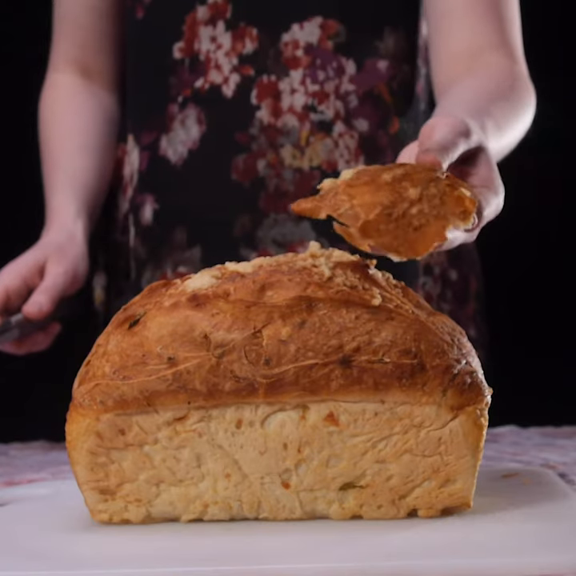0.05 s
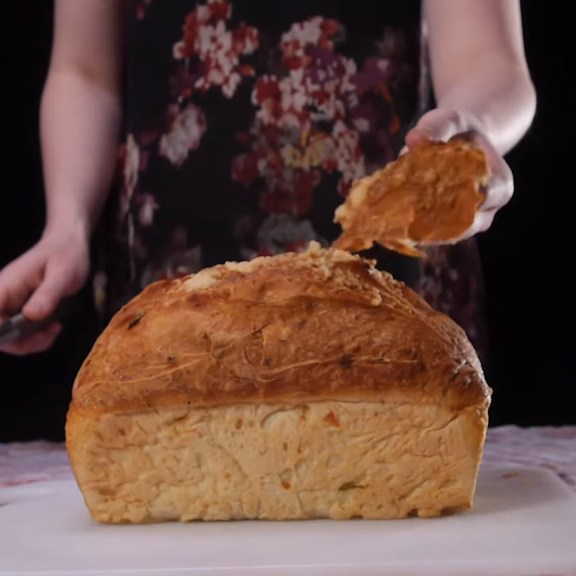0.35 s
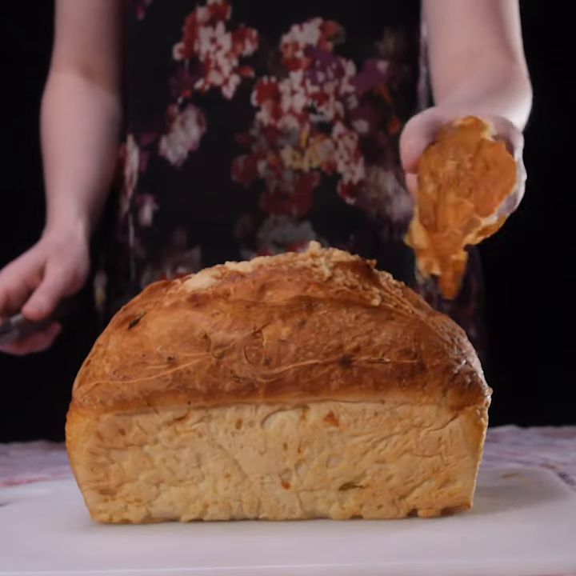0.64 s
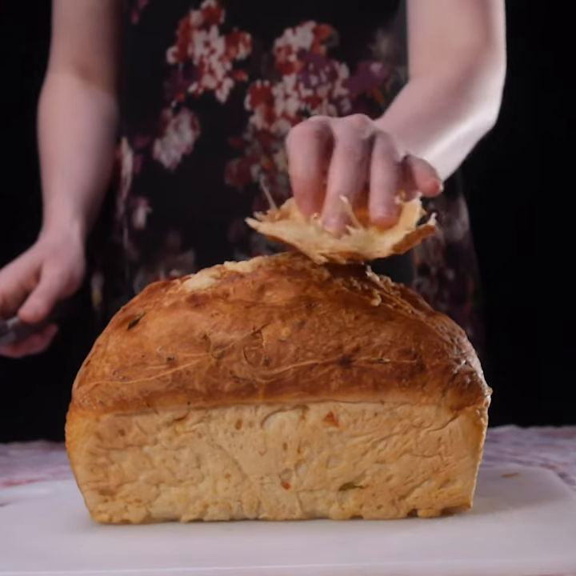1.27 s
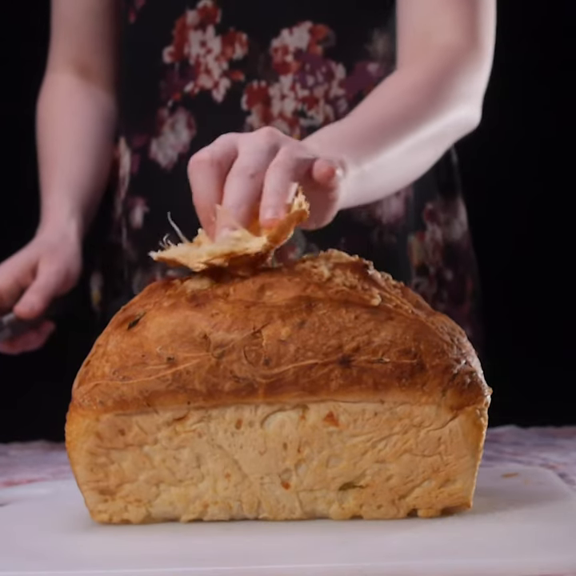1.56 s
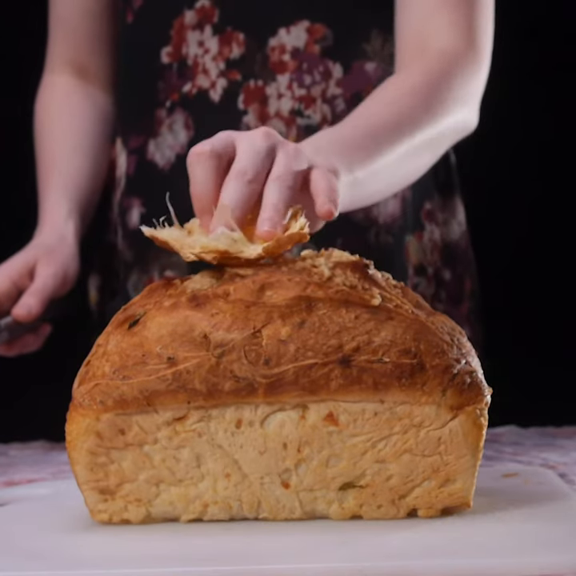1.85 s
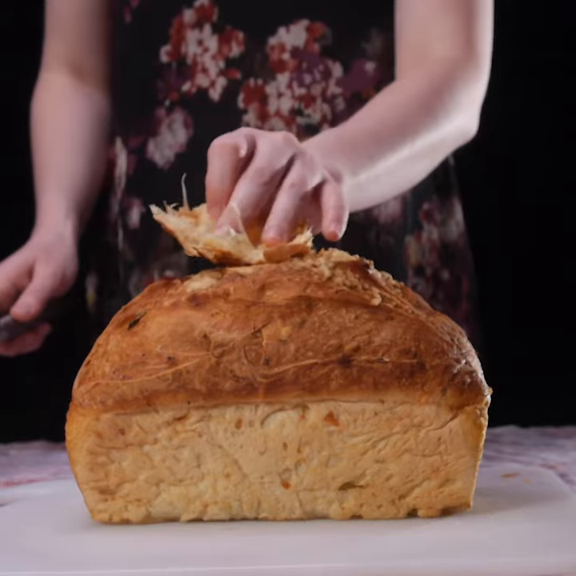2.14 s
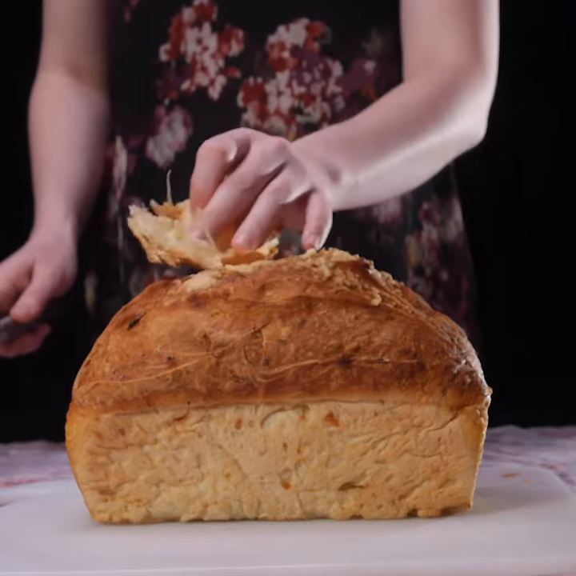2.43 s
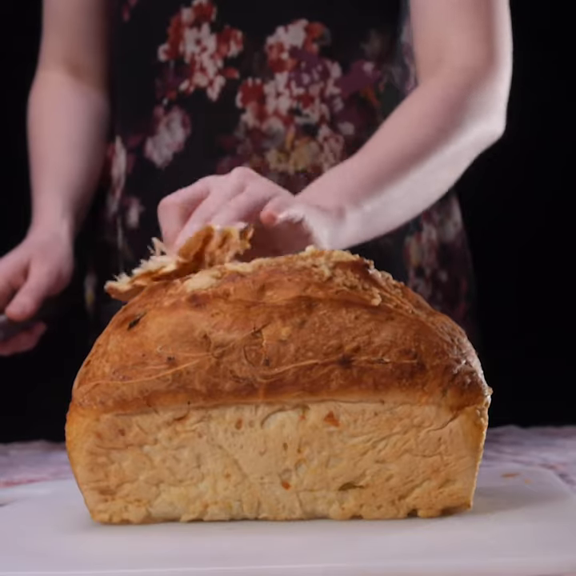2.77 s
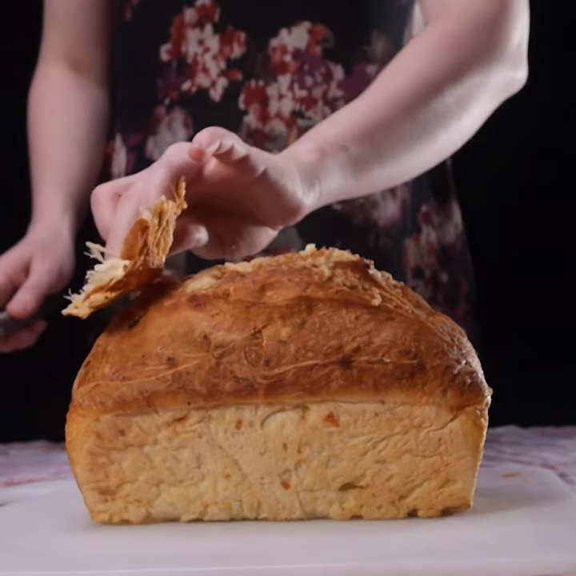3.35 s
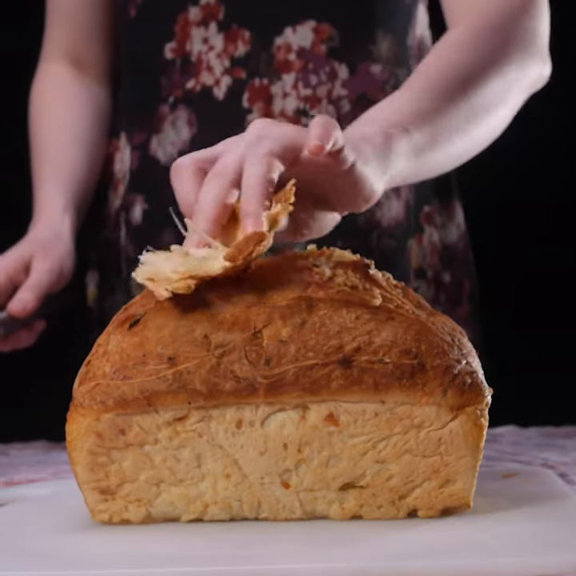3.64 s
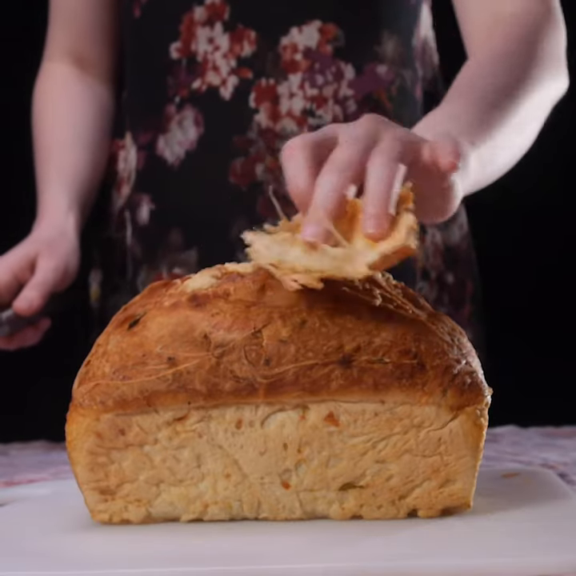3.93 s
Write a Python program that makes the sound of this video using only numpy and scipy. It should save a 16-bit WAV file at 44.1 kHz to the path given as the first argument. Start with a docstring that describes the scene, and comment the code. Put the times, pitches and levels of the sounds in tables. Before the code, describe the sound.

Crisp scraping and ticking of a crust piece dragged across a loaf of bread.

```python
"""Crust scraping a loaf

A torn piece of crust is dragged over the dry top of a loaf, close by in a quiet room.
Its edge catches on countless tiny ridges: each slip knocks the hollow loaf and snaps in the brittle
crust. Between the long drags come brief scratches, single ticks and soft bumps, over a low room rumble."""
import sys
import numpy as np
from scipy import signal
from scipy.fft import rfft, irfft
from scipy.io import wavfile
from scipy.ndimage import uniform_filter1d

SR = 44100
rng = np.random.default_rng(int(sys.argv[2]) if len(sys.argv) > 2 else 0)


def store_pcm(level_fs):
    """Save levels as 16-bit WAV."""
    pcm = np.round(np.clip(level_fs, -1, 1) * 32767).astype(np.int16)
    wavfile.write(sys.argv[1], SR, np.atleast_2d(pcm).T)


N = 176400
T = np.arange(N) / SR
LOAF, CRUST, FLAKES = range(3)   # the three voices of a scrape: hollow body, crunch, fine treble

# Tone of the finest flakes, with the piece lying flat and up on its tip.
# Each row: frequency in Hz, relative level in dB.
FLAKES_FLAT = [(4000, -46.5), (6200, -4), (7900, 5), (8700, 2.5), (9600, -14.5), (11000, -11), (12700, -3),
               (14000, -13), (15500, -20)]
FLAKES_TIP = [(4000, -26.5), (6300, 3), (8300, -0.5), (10000, -4.5), (11500, -10), (13600, -8),
              (15500, -13)]


def from_db(db):
    """Decibels to gain."""
    return 10 ** (np.asarray(db) / 20)


def rms_one(x):
    """Scale to rms 1."""
    return x / np.sqrt(np.mean(x ** 2) + 1e-20)


def unit_energy(x):
    """Scale a response so that it keeps the power of white noise."""
    return x / np.sqrt(np.sum(x ** 2))


def levelled(x, samples, floor=0):
    """Ride the gain so that the running rms stays near 1."""
    return x / np.sqrt(uniform_filter1d(x ** 2, size=samples) + floor)


def through(x, response):
    """Pass a sound through an impulse response."""
    return signal.fftconvolve(x, response)[:len(x)]


def butter(x, hz, kind):
    """Second-order low-pass or high-pass."""
    return signal.sosfilt(signal.butter(2, hz, kind, fs=SR, output="sos"), x)


def resonance(x, hz, t60):
    """One ringing mode, with gain 1 at its peak."""
    r = from_db(-60 / (t60 * SR))
    feedback = [1, -2 * r * np.cos(2 * np.pi * hz / SR), r * r]
    return signal.lfilter(np.array([1, 0, -1]) * (1 - r * r) / 2, feedback, x)


def response_of(spectrum, size=16384):
    """Minimum-phase impulse response for a tone curve of (Hz, relative dB) points."""
    hz, db = np.transpose(spectrum)
    grid_hz = np.maximum(np.arange(size // 2 + 1) * SR / size, 1)
    gain = from_db(np.interp(np.log(grid_hz), np.log(hz), db))
    cepstrum = irfft(np.log(gain))
    cepstrum[1:size // 2] *= 2
    cepstrum[size // 2 + 1:] = 0
    return unit_energy(irfft(np.exp(rfft(cepstrum))))


def noise(spectrum):
    """Steady noise of one colour, rms 1."""
    return rms_one(through(rng.standard_normal(N + SR), response_of(spectrum))[SR:])


def drift(hz):
    """Smooth random wobble, rolling off above hz; rms 1."""
    r = np.exp(-2 * np.pi * hz / SR)
    return rms_one(signal.lfilter([1], [1, -2 * r, r * r], rng.standard_normal(N + SR))[SR:])


def gate(start, end, attack_s=0.0068, release_s=0.005):
    """Quick attack, hold, exponential release."""
    attack = np.clip((T - start) / attack_s + .5, 0, 1)
    return attack * np.exp(-np.clip((T - end) / release_s, 0, 20))


def room_tone(rumble_db=-30, hiss_db=-55.5):
    """The still air of the room: a deep rumble and a faint hiss."""
    # Tone curves of the two beds. Each row: frequency in Hz, relative level in dB.
    rumble = [(12, -1.5), (22, 0.5), (30, -10), (38, -29), (49, -24.5), (59, -34), (200, -66.5)]
    hiss = [(40, -20), (100, 2), (160, -7.5), (500, -15), (2000, -24.5), (8500, -33), (15500, -48)]
    return from_db(rumble_db) * noise(rumble) + from_db(hiss_db) * noise(hiss)


def reflections(t60):
    """Dense echoes that start after a millisecond and die away."""
    t = T[:SR]
    return rng.standard_normal(SR) * from_db(-60 * t / t60) * (t > .001)


def room(x, wet_db=-10.5, crossover_hz=2000):
    """The room adds a short tail whose treble dies first."""
    lows = butter(reflections(t60=0.5), crossover_hz, "low")
    highs = butter(reflections(t60=0.25), crossover_hz, "high")
    return x + from_db(wet_db) * through(x, unit_energy(lows + highs))


def bumps(trim_db=-1):
    """Dull thuds as the hand shifts its grip and leans on the soft loaf."""
    # Handling cues. Each row: start in seconds, length in seconds, level in dB before the trim.
    cues = [(0.642, 0.047, -43), (0.813, 0.15, -45.5), (1.233, 0.038, -37.5), (2.152, 0.052, -39),
            (2.273, 0.008, -35), (2.327, 0.11, -58), (3.052, 0.016, -42.5), (3.204, 0.13, -41.5),
            (3.981, .025, -34)]
    # Tone of a thud. Each row: frequency in Hz, relative level in dB.
    thud_tone = [(45, -2.5), (100, 14.5), (160, -7), (225, 2.5), (300, -15), (800, -25.5), (2500, -106)]
    envelope = sum(from_db(db + trim_db) * gate(start, start + length, release_s=0.013)
                   for start, length, db in cues)
    return envelope * levelled(noise(thud_tone), samples=900)


def pressure(voice):
    """How hard the drags and scratches drive one voice."""
    # Long drags, one envelope each. Each row: time in seconds, then loaf, crust and flake drive in dB.
    drags = [
        [(1.187, -37, -39, -52), (1.2, -42, -45.5, -57), (1.215, -45, -47, -61), (1.255, -37.5, -44.5, -50.5),
         (1.272, -51, -47, -63), (1.3, -45, -40.5, -49), (1.335, -49, -43, -45), (1.348, -50.5, -57, -69),
         (1.39, -44.5, -42, -46.5), (1.425, -38, -51, -56), (1.455, -48, -39.5, -48),
         (1.533, -47.5, -42.5, -48)],
        [(1.733, -46, -45, -50.5), (1.752, -41, -45, -51.5), (1.778, -49, -62, -69), (1.797, -47, -43.5, -50),
         (1.825, -49, -58, -70), (1.856, -44, -47, -64)],
        [(2.03, -49, -66, -76), (2.07, -47.5, -53, -65), (2.115, -46, -53, -58.5), (2.16, -49.5, -60.5, -78),
         (2.25, -45.5, -52.5, -56.5), (2.3, -52.5, -60, -71), (2.32, -47.5, -42.5, -50), (2.365, -43, -54, -75),
         (2.39, -45.5, -45, -50), (2.47, -48.5, -57, -66), (2.6, -53.5, -57, -65.5)],
        [(3.368, -46, -47.5, -57), (3.41, -44, -45, -57), (3.445, -40.5, -39, -47.5), (3.48, -41, -39.5, -48),
         (3.515, -40, -37.5, -40), (3.573, -38, -37.5, -47.5)],
        [(3.707, -40.5, -45.5, -48.5), (3.732, -39.5, -33.5, -53), (3.748, -43, -50, -58),
         (3.785, -44, -46, -54.5), (3.808, -42.5, -42, -50), (3.85, -47.5, -42.5, -46.5),
         (3.895, -49.5, -47, -56.5), (3.925, -44, -39.5, -47.5), (3.957, -43, -39, -50.5),
         (3.975, -46.5, -49.5, -53), (4.0, -46, -48.5, -55.5)],
    ]
    # Brief scratches. Each row: start and length in seconds, then loaf, crust and flake drive in dB.
    scratches = [(0.551, 0.032, -53.5, -56, -55.5), (0.827, 0.016, -54, -57, -55.5),
                 (0.852, 0.022, -49.5, -55, -58), (0.882, 0.0095, -45, -51, -62),
                 (0.92, 0.017, -42, -44, -56.5), (1.577, 0.017, -45.5, -45.5, -59),
                 (1.933, 0.053, -46, -54, -62), (2.761, 0.038, -46.5, -46, -51),
                 (3.215, 0.015, -68, -64, -60), (3.248, 0.018, -41.5, -50.5, -59),
                 (3.29, 0.03, -48, -57.5, -67), (3.333, 0.011, -49, -50.5, -62)]
    drive = np.zeros(N)
    for drag in drags:
        times, *db = np.transpose(drag)
        drive += from_db(np.interp(T, times, db[voice])) * gate(times[0], times[-1])
    for start, length, *db in scratches:
        drive += from_db(db[voice]) * gate(start, start + length)
    return drive


def crust(force, flat_tone, tip_tone):
    """The piece changes colour as it tilts from its flat side onto its stiffer tip."""
    # Tilt of the piece. Each row: time in seconds, tilt from 0 (flat) to 1 (tip).
    tilt_curve = [(.55, 0.7), (1.15, 0.07), (2.3, 0.31), (2.75, 0.5), (3.5, 0.66), (3.75, 0.43)]
    tilt = np.clip(np.interp(T, *np.transpose(tilt_curve)), 0, 1)
    flat = through(force * (1 - tilt), response_of(flat_tone))
    return flat + through(force * tilt, response_of(tip_tone))


def loaf(force, blunt_hz=1260):
    """The hollow body, with a few room and table resonances; duller under a blunt contact."""
    # How sharply the edge bites. Each row: time in seconds, bite from 0 (blunt) to 1 (sharp).
    bite_curve = [(1.25, 1), (1.42, 0.55), (2.3, 0.53), (3.45, 0), (3.71, 1)]
    # Tone of a knock on the loaf. Each row: frequency in Hz, relative level in dB.
    knock_tone = [(90, 5.5), (400, -4), (570, 0.5), (950, -3.5), (1600, -9), (2000, -9.5), (2700, -14),
                  (5000, -51)]
    # Narrow ringing tones of the room and table, set off by the scrape.
    # Each row: pitch in Hz, relative level in dB, T60 in seconds.
    room_resonances = [(227, 1.5, 0.1), (547.4, -1.5, 0.073), (615, -6.5, 0.15), (810, -5, 0.093),
                       (870, -9, 0.2), (988, 0, 0.11), (1274, -1.5, 0.042), (1324, 0.5, 0.11),
                       (1581, 3.5, 0.08)]
    bite = np.clip(np.interp(T, *np.transpose(bite_curve)), 0, 1)
    contact = butter(force, blunt_hz, "low") - bite * butter(force, blunt_hz, "high")
    knock = response_of(knock_tone)
    room_ring = sum(from_db(db) * resonance(knock, hz, t60) for hz, db, t60 in room_resonances)
    return through(contact, unit_energy(knock + room_ring))


def splinters(per_s=70, gain_db=-36):
    """Lone crumbs break off and click in the finest flakes, even under a light touch."""
    breaks = rng.random(N) < per_s / SR
    clicks = rms_one(breaks * rng.uniform(-0.84, 1, N))
    return from_db(gain_db) * crust(clicks * np.sqrt(pressure(FLAKES)), FLAKES_FLAT, FLAKES_TIP)


def ticks(voice, snap_db=-3.5, crumble_db=-6, crumble_s=0.0057):
    """Single flakes snap: sharp impulses, and the envelope of the smaller snaps each sets off."""
    # Snap cues. Each row: time in seconds, then relative loaf, crust and flake drive in dB.
    cues = [(0.04, -54, -55, -54), (0.675, -67, -52.5, -57), (.8275, -47, -43, -54),
            (1.097, -59, -46.5, -56), (1.247, -48, -35.5, -56), (2.187, -42, -56, -54),
            (2.763, -73, -42, -65), (3.046, -31, -36.5, -53), (3.439, -53, -33.5, -62),
            (3.571, -55, -34, -50), (3.7071, -49, -32.5, -56), (3.806, -45, -33, -44)]
    snap, crumble = np.zeros(N), np.zeros(N)
    for start, *db in cues:
        i = int(start * SR)
        snap[i] += from_db(db[voice] + snap_db) * np.sqrt(0.0035 * SR)   # 3.5 ms of energy at once
        decay = np.exp(-np.minimum(T[:N - i] / crumble_s, 20))
        crumble[i:] += from_db(db[voice] + crumble_db) * decay
    return snap, crumble


def catches(stream, overtone_db=-16, stage_t60=0.016):
    """Where the edge digs in, the slips ring one hollow note of the loaf's shell and its octave."""
    # Catch cues. Each row: start in seconds, length in seconds, pitch in Hz, level in dB.
    cues = [(0.885, 0.0076, 1350, -47), (0.927, 0.01, 810, -40), (1.183, 0.026, 620, -44.5),
            (1.23, 0.024, 265, -41), (1.388, 0.028, 595, -38.5), (1.426, 0.029, 770, -43.5),
            (1.452, 0.067, 550, -49), (3.471, 0.0084, 174, -35), (3.949, 0.0081, 1616, -39.5)]
    out = np.zeros(N)
    for start, length, hz, db in cues:
        for pitch, level_db in ((hz, db), (2 * hz, db + overtone_db)):
            ring = resonance(resonance(stream, pitch, stage_t60), pitch, stage_t60)
            ring = levelled(ring, samples=700, floor=1e-9)
            out += from_db(level_db) * gate(start, start + length) * ring
    return out


def slips(per_s=1100, size_spread_db=1.5, colour_spread_db=2, ring_cycles=10.1):
    """Uneven slips of the edge, each ringing briefly at its own mix of pitches; rms 1."""
    at = np.flatnonzero(rng.random(N) < per_s / SR)
    size = np.zeros(N)
    size[at] = from_db(size_spread_db * np.minimum(rng.exponential(1, N), 6.8))[at]   # cap the outliers
    size = levelled(size, samples=1000, floor=1e-6)
    out = np.zeros(N)
    for hz in np.geomspace(120, 15000, 26):
        colour, polarity = rng.standard_normal((2, N))
        kicks = np.full(N, 1e-18)
        kicks[at] = size[at] * from_db(colour_spread_db * colour[at]) * np.sign(polarity[at])
        out += resonance(kicks, hz, ring_cycles / hz)
    return rms_one(out)


def scraping(judder_hz=105, judder_db=2):
    """One stream of slips drives the loaf, the brittle crust and its finest flakes."""
    # Smooth rubbing, in dB relative to the slips: for loaf, crust and flakes in turn.
    rubbing_db = [-0.5, 3, 6.5]
    # Tone of the crunch, lying flat and up on the tip. Each row: frequency in Hz, relative level in dB.
    crust_flat = [(1200, -30), (2400, -9.5), (2950, -0.5), (3700, 2), (4400, -5), (5100, -8), (5800, -16.5),
                  (7500, -21.5), (12000, -68.5)]
    crust_tip = [(1200, -23.5), (2400, -17), (3100, -7), (4400, 1.5), (5300, -2.5), (5900, -15),
                 (7500, -24), (12000, -61)]
    stream = slips()
    judder = rms_one(from_db(judder_db * drift(judder_hz)))   # the edge sticks and lets go
    force = {}
    for voice in (LOAF, CRUST, FLAKES):
        grain = rms_one(stream + from_db(rubbing_db[voice]) * rng.standard_normal(N))
        snap, crumble = ticks(voice)
        force[voice] = grain * (judder * pressure(voice) + crumble) + snap
    body = from_db(-0.5) * loaf(force[LOAF])
    crunch = from_db(-1) * crust(force[CRUST], crust_flat, crust_tip)
    sizzle = from_db(-2) * crust(force[FLAKES], FLAKES_FLAT, FLAKES_TIP)
    return body + crunch + sizzle + catches(stream)


def scene():
    """Crust on loaf, in the room, over a bed of room tone; mono."""
    bed = room_tone()
    bread = scraping() + splinters() + bumps()
    return (room(bread) + bed)[None]


def record(dry):
    """A steep low-pass takes off the very top."""
    cutoff_hz = 15750
    return signal.sosfilt(signal.ellip(12, .1, 90, cutoff_hz, fs=SR, output="sos"), dry)


dry = scene()
out = record(dry)
store_pcm(out)
```